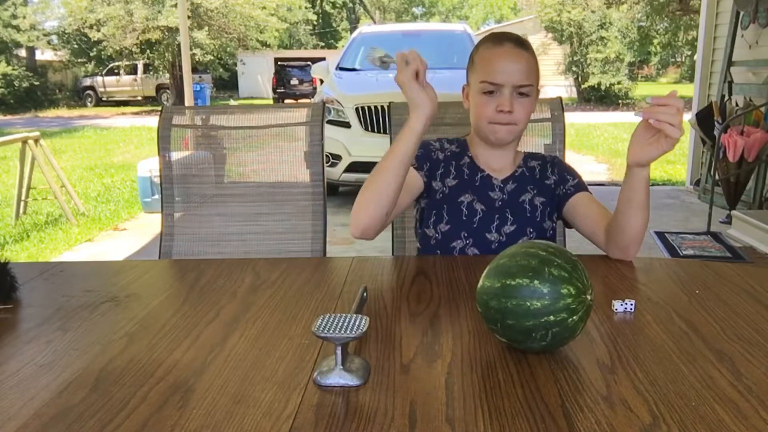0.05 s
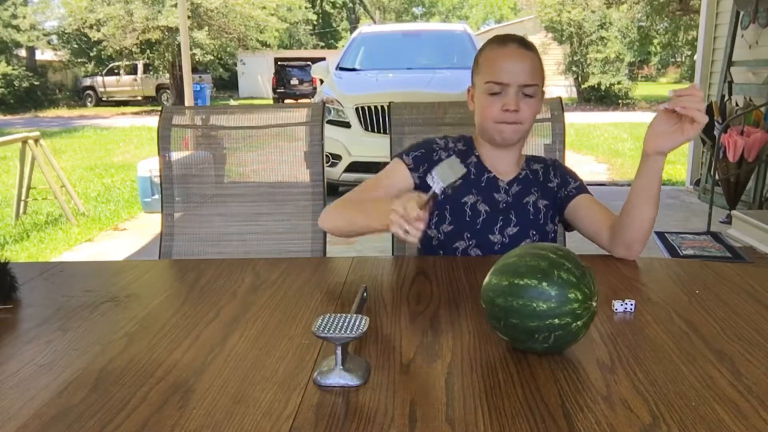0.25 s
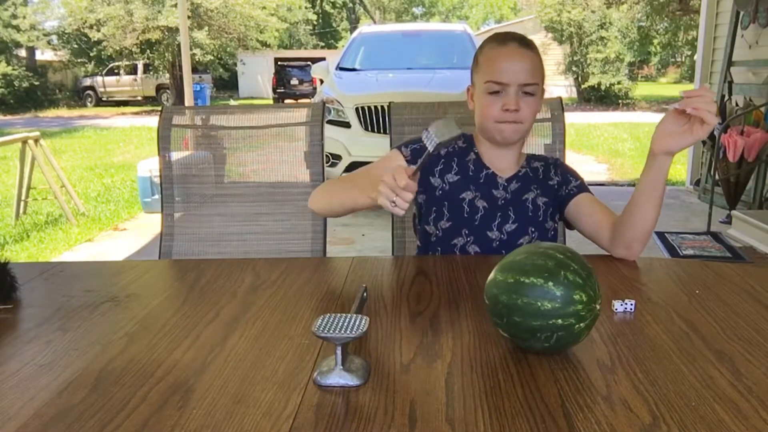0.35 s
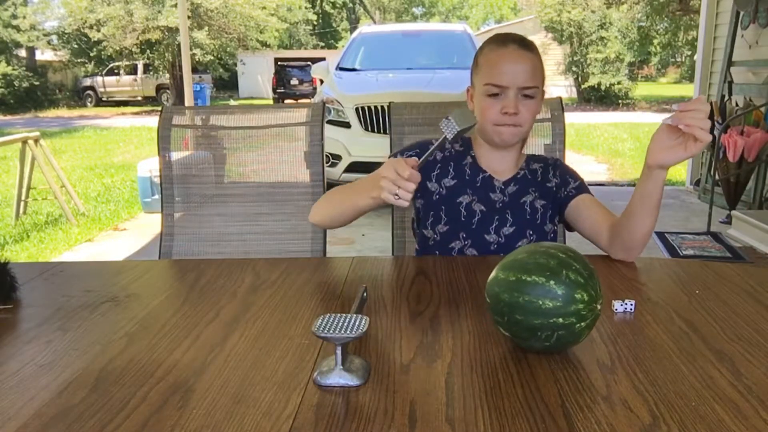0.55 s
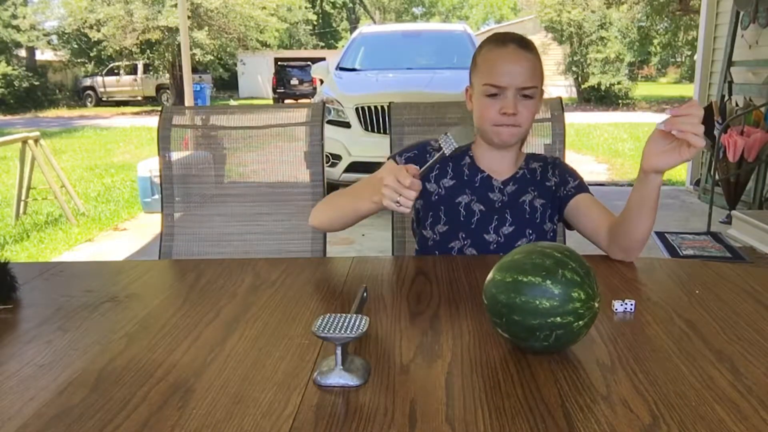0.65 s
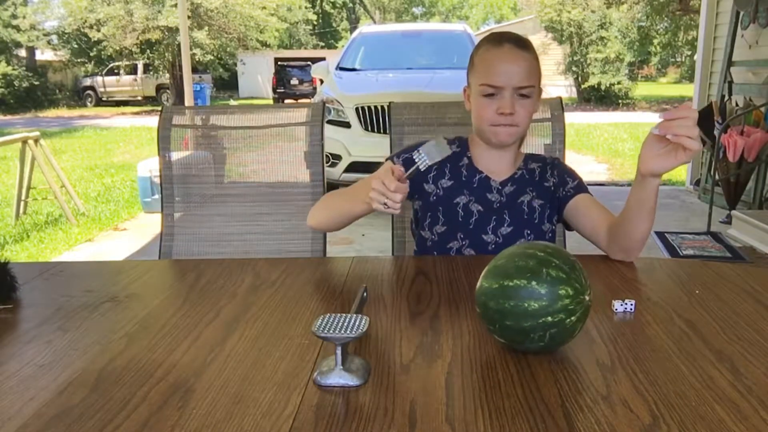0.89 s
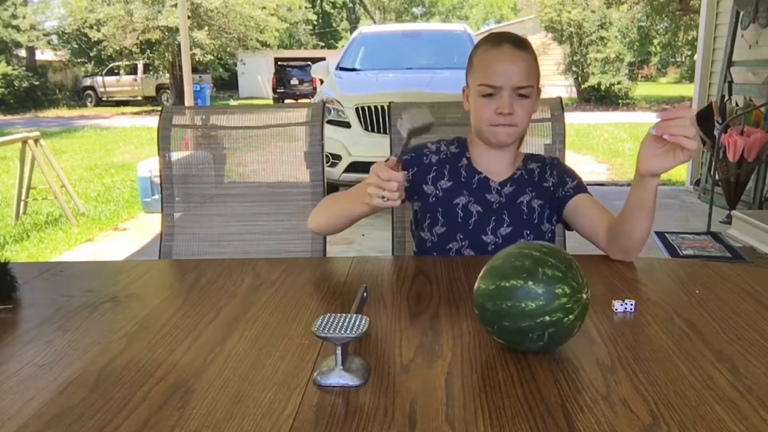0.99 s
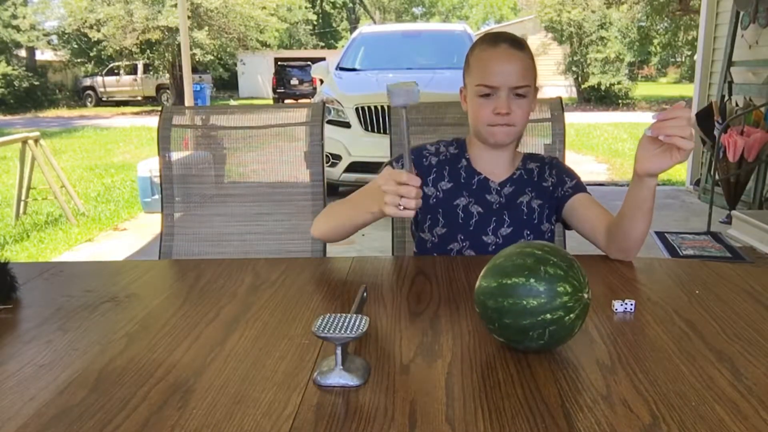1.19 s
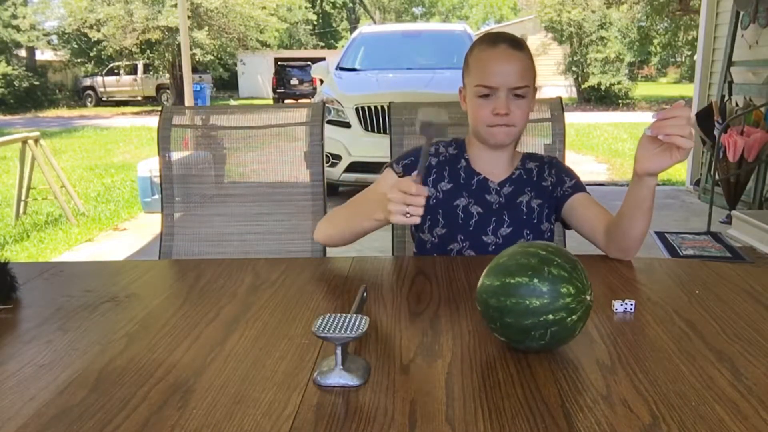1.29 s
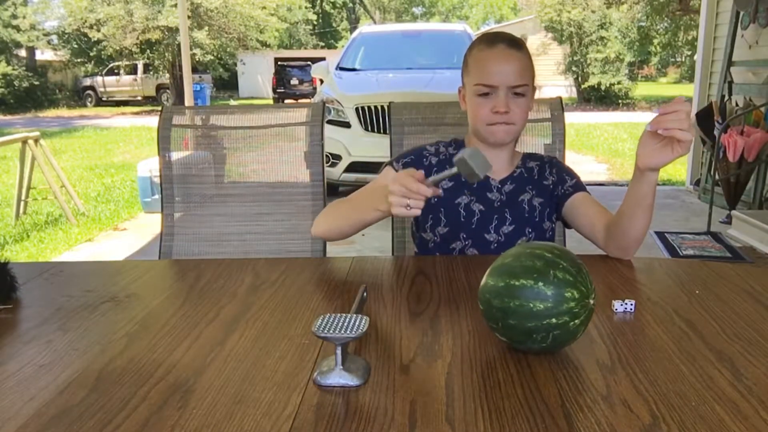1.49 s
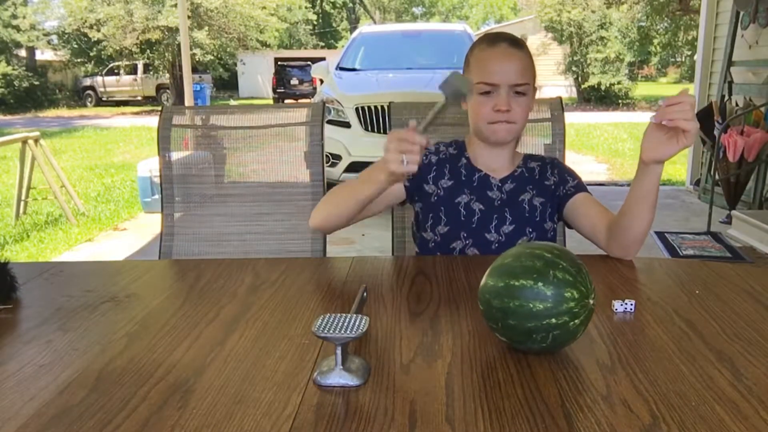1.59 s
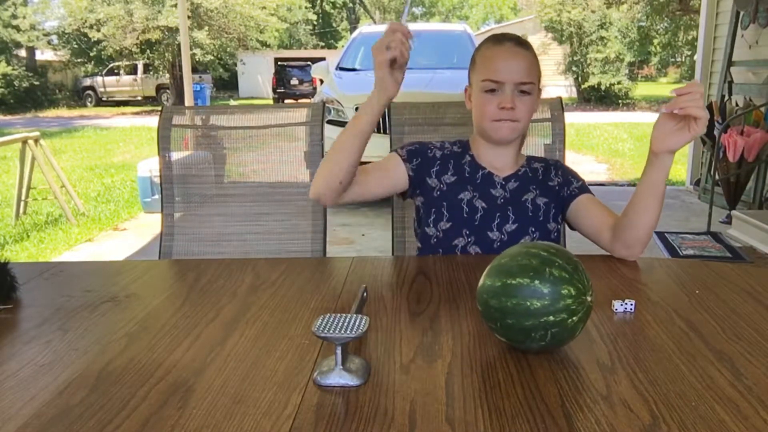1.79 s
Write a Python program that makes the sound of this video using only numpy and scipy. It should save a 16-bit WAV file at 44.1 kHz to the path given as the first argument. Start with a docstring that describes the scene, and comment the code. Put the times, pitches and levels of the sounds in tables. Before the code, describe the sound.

Close to the microphone, one hard mallet blow cracks and knocks on a hollow melon, followed by a low table thump, a short porch echo and small wooden taps, over quiet yard air, engine hum and insects.

```python
"""Mallet on a watermelon, under a porch

Close by, a small metal mallet whacks a watermelon on a wooden table: a crack, a hollow knock, a thump.
Crack, melon, table, tail lumps and rattle are damped modes; the porch answers with decaying noise-like taps.
Beyond it, a distant engine drones in wavering sines, a far bird whistles once in a gliding sine,
and shaped, patchy noise makes the yard with its insect hiss."""
import sys
import numpy as np
from scipy import signal
from scipy.io import wavfile
from scipy.ndimage import uniform_filter1d

SR = 44100
rng = np.random.default_rng(int(sys.argv[2]) if len(sys.argv) > 2 else 0)


def inscribe(sig):
    """Save sig as 16-bit PCM at rate SR to the path in sys.argv[1].

    A 1-D sig is mono; a 2-D sig holds one channel per row.
    Samples are clipped to [-1, 1] before scaling.
    """
    pcm = np.round(np.clip(np.atleast_2d(sig).T, -1, 1) * 32767)
    wavfile.write(sys.argv[1], SR, pcm.astype(np.int16))


N = 81585
TIME = np.arange(N) / SR  # seconds
BLOW_S, BLOW_DB = 0.22945, -3  # when and how hard the mallet lands


def amp(db):
    """Decibels to amplitude."""
    return 10 ** (np.asarray(db) / 20)


def evened(x):
    """Scale to an rms of 1."""
    return x / np.sqrt(np.mean(x ** 2) + 1e-20)


def curve(points, column=1):
    """A table column joined by straight lines in time."""
    p = np.array(points)
    return np.interp(TIME, p[:, 0], p[:, column])


def between(points):
    """True from the first to the last time of a table."""
    return (TIME > points[0][0]) & (TIME < points[-1][0])


def clicks(rows):
    """One impulse for each (start_s, level_db) row."""
    x = np.zeros(N)
    for start_s, level_db in rows:
        x[round(start_s * SR)] += amp(level_db)
    return x


def ring(modes):
    """Sum of damped sines, each with a soft start."""
    t = np.arange(SR // 2) / SR
    total = np.zeros(len(t))
    for pitch_hz, level_db, t60_s, rise_s in modes:
        envelope = amp(level_db - 60 * t / t60_s) * (1 - np.exp(-t / rise_s))
        total += envelope * np.sin(2 * np.pi * pitch_hz * t)
    return total


def struck(rows, modes):
    """Let each (start_s, level_db) impulse set the modes ringing."""
    return signal.fftconvolve(clicks(rows), ring(modes))[:N]


# Spectrum of the open yard, relative: pitch_hz, level_db (per Hz)
YARD_SPECTRUM = [(25, -14), (40, -17.5), (55, -12), (100, -4), (250, -7), (330, -15), (500, -22),
                 (1000, -24.5), (3000, -26), (4500, -35.5), (6000, -38), (8300, -50.5), (9000, -37),
                 (10000, -30.5), (11000, -35), (11500, -52.5), (15800, -63), (16000, -75)]
YARD_DB, PATCH_DB = -52.5, 1.95  # overall rms level, rms patchiness


def yard():
    """Rumble, air and an insect band near 10 kHz: noise whose spectrum varies in patches."""
    frames, hz = N // 256 + 5, np.fft.rfftfreq(1024, 1 / SR)
    real, imag, patches = rng.standard_normal((frames, 513, 3)).T
    patches = uniform_filter1d(patches, 10, 0)  # over pitch
    patches = evened(uniform_filter1d(patches, 12, 1))  # over time
    pitch_hz, level_db = np.transpose(YARD_SPECTRUM)
    level = np.interp(np.log(hz + 1), np.log(pitch_hz), level_db)[:, None]
    spectrum = (real + 1j * imag) * amp(level + PATCH_DB * patches)
    noise = signal.istft(spectrum, nperseg=1024, noverlap=768)[1][:N]
    return amp(YARD_DB) * evened(noise)


WAVER_DB, WAVER_RAD = 1, 0.58  # rms wander of level and phase
WAVER_HZ = 6.94  # fastest wander


def slow():
    """Random wander, rms 1: sines from 0.5 Hz up, the slower ones stronger."""
    return evened(sum(np.sin(2 * np.pi * (f * TIME + rng.random())) / np.sqrt(f)
                      for f in np.geomspace(0.5, WAVER_HZ, 12)))


ENGINE_HZ = 24.14
# Low engine tones, steady but for the waver: multiple (of ENGINE_HZ), level_db (rms)
LOW_TONES = [(2.2, -58), (3, -64), (4, -61)]
# Upper engine tones that swell and fade: multiple (of ENGINE_HZ)
UPPER_TONES = [5, 8, 11.1]
# Their swells: time_s, then level_db (rms) of each upper tone in turn
UPPER_SWELLS = [(0, -58, -54, -67), (.15, -61, -53.5, -57.5), (.35, -68, -52.5, -61.5),
                (.46, -67, -53, -53.5), (.62, -57, -56, -53.5), (.75, -54, -58.5, -59.5),
                (.91, -52, -55.5, -59), (1.15, -54, -55.5, -68.5), (1.33, -57.5, -60, -71),
                (1.45, -53, -68.5, -70), (1.55, -66, -62.5, -75), (1.85, -75, -58.5, -65)]


def engine():
    """Low tones of a distant idling engine, each wavering on its own in level and phase."""
    swelling = [(k, curve(UPPER_SWELLS, i + 1)) for i, k in enumerate(UPPER_TONES)]
    total = np.zeros(N)
    for multiple, level_db in LOW_TONES + swelling:
        level = amp(level_db + WAVER_DB * slow())
        phase = 2 * np.pi * (multiple * ENGINE_HZ * TIME + rng.random())
        total += level * np.sin(phase + WAVER_RAD * slow())
    return np.sqrt(2) * total  # rms to peak


# Whistle of a far bird: time_s, pitch_hz, level_db
WHISTLE = [(.49, 1980, -67), (.53, 2130, -69), (.57, 2150, -58), (.61, 2140, -69)]


def bird():
    """One faint whistle, a sine that rises and then levels off."""
    phase = 2 * np.pi * np.cumsum(curve(WHISTLE)) / SR
    return amp(curve(WHISTLE, 2)) * np.sin(phase) * between(WHISTLE)


# Light taps of something on the table: start_s, level_db (9 dB is taken off), pitch_hz (lowest mode),
# tilt_db (brightness per octave), ring_factor (times t60_s)
RATTLE_TAPS = [(0.411, -31.5, 900, -7, 0.72), (0.479, -41, 602, -2, 0.94), (0.563, -25, 718, 1, 0.95),
               (0.601, -32, 823, -0.5, 0.65), (0.64, -36.5, 732, -0.5, 1), (0.684, -31, 742, 3.9, 0.42),
               (0.718, -41, 726, -14, 0.97), (0.809, -43, 713, -2, 0.78), (0.904, -39.5, 640, 0, 0.58),
               (0.949, -44.5, 610, -3, 0.8)]
# Wooden modes, retuned by each tap: pitch_hz, level_db (relative), t60_s
RATTLE_MODES = [(719, 0, 0.092), (1060, -2, 0.049), (1319, -9.5, 0.071), (1542, -11.5, 0.075),
                (1680, -17.5, 0.072), (1850, -18.5, 0.073), (2200, -28, 0.049)]
# Murmur behind the taps: time_s, level_db (rms)
MURMUR = [(.4, -47), (.44, -51), (.53, -75), (.58, -50.5), (.7, -53.5), (.8, -65.5), (.95, -65.5),
          (1.05, -94)]
MURMUR_BAND_HZ = [532, 937]


def rattle():
    """Light taps on a few wooden modes, with a dull murmur of band noise behind."""
    low_hz = RATTLE_MODES[0][0]
    taps = np.zeros(N)
    for start_s, level_db, tap_hz, tilt_db, ring_factor in RATTLE_TAPS:
        modes = [(hz * tap_hz / low_hz, db - 9 + tilt_db * np.log2(hz / low_hz), t60_s * abs(ring_factor), 0.0003)
                 for hz, db, t60_s in RATTLE_MODES]
        taps += struck([(start_s, level_db)], modes)
    band = signal.butter(2, MURMUR_BAND_HZ, "band", fs=SR, output="sos")
    noise = evened(signal.sosfilt(band, rng.standard_normal(N)))
    return taps + noise * amp(curve(MURMUR)) * between(MURMUR)


# Modes of the wooden table top: pitch_hz, level_db (relative), t60_s, rise_s
TABLE_MODES = [(117.8, -8.5, 0.66, 0.0045), (94.4, -3, 0.26, .004), (58, -7, 0.093, .005)]
# Thumps into it, the blow and the melon's hops: start_s, level_db, ring_factor (times t60_s)
TABLE_THUMPS = [(0.237, -20, 0.72), (.325, -22.5, 0.46), (0.417, -35, .6), (.472, -35.5, 0.76)]


def table():
    """Low damped modes of the table top, set ringing by each thump."""
    total = np.zeros(N)
    for start_s, level_db, ring_factor in TABLE_THUMPS:
        modes = [(hz, db, t60_s * abs(ring_factor), rise_s) for hz, db, t60_s, rise_s in TABLE_MODES]
        total += struck([(start_s, level_db)], modes)
    return total


# Brief pitched lumps in the blow's ringing tail: start_s, pitch_hz, level_db, t60_s
TAIL_LUMPS = [(0.2406, 3000, -22, 0.028), (.247, 2050, -22, 0.028), (0.262, 1510, -16, 0.018),
              (0.271, 1395, -29, 0.025), (0.289, 1930, -29, 0.02), (.302, 656, -30.5, 0.045),
              (.314, 2350, -33, 0.01)]


def tail_lumps():
    """One short damped mode for each lump of the tail."""
    return sum(struck([(start_s, level_db)], [(pitch_hz, 0, t60_s, 0.002)])
               for start_s, pitch_hz, level_db, t60_s in TAIL_LUMPS)


# Decay under the porch, then in the yard beyond, levels relative to the blow:
# pitch_hz, t60_s, level_db, far_t60_s, far_level_db
PORCH_DECAY = [(147, 1, -5, 1.1, -31), (410, 0.45, -5.5, 2.1, -33), (610, 0.21, -2, 3.2, -18.5),
               (970, 0.28, -2, 1.1, -32.5), (1460, 0.33, -1, 0.98, -13), (2210, 0.35, -6.5, 0.98, -36),
               (3100, 0.27, -10, 1.4, -32), (4760, 0.21, -12.5, 1.2, -35), (6900, .24, -14.5, 1.5, -40),
               (8300, 0.21, -23, 2.2, -50), (12000, 0.13, -17.5, 1.8, -48), (16000, 0.24, -37, 1.9, -56)]
PORCH_GAP_S, PORCH_RISE_S = 0.001, 0.0024  # wait after the blow; ramp time per unit of gain
LUMP_DB = 2.5  # rms unevenness of the decay


def porch():
    """Dense taps after the blow that die band by band, near walls fast and the yard slowly."""
    size = 3 * SR // 2
    taps = np.zeros(size)
    at = np.arange(0, size - 20, 20)
    taps[at + rng.integers(0, 20, len(at))] = rng.choice([-1., 1.], len(at))
    hz, t, spectrum = signal.stft(taps, SR, nperseg=256)
    pitch_hz, *columns = np.transpose(PORCH_DECAY)
    t60_s, level_db, far_t60_s, far_level_db = [
        np.interp(np.log(hz + 1), np.log(pitch_hz), column)[:, None] for column in columns]
    near = amp(level_db - 60 * t / t60_s)
    far = amp(far_level_db - 60 * t / far_t60_s)
    lumps = uniform_filter1d(rng.standard_normal(spectrum.shape), size=4, axis=0)
    lumps = evened(uniform_filter1d(lumps, size=3, axis=1))
    shaped = spectrum * np.hypot(near, far) * amp(LUMP_DB * lumps)
    tail = signal.istft(shaped, SR, nperseg=256)[1][:size]
    tail = tail * np.minimum(0.4 + np.arange(size) / SR / PORCH_RISE_S, 1)
    return signal.fftconvolve(clicks([(BLOW_S + PORCH_GAP_S, BLOW_DB)]), tail)[:N]


# Mallet face on rind: pitch_hz, level_db (relative to the blow), t60_s, rise_s
CRACK_MODES = [(2800, 5, 0.0015, .00003), (5000, 0, 0.0012, 0.000028), (7230, 9.5, 0.00048, 0.0000045),
               (13700, -24, 0.00017, 0.0000079)]
# Crack direct and off the table top: delay_s, level_db (relative to the blow)
CRACK_PATHS = [(0, 2), (.00033, -8.5)]
# Hollow melon: pitch_hz, level_db (relative to the blow), t60_s, rise_s
MELON_MODES = [(1760, -6, .01, .0003), (1280, -4, 0.018, 0.001), (655, -0.5, 0.02, 0.00072),
               (574, -14, 0.057, 0.0023), (443, -30, 0.13, 0.0016), (356, -25.5, 0.22, 0.00067),
               (250, -20.5, 0.17, 0.001), (202, -6.5, 0.063, .004)]
# Dull echoes of the blow: delay_s, level_db (relative)
BLOW_ECHOES = [(.0036, -15.5), (.0082, -25), (.0125, -26), (.0855, -36)]
KNOCK_LAG_S = 0.00034  # melon after mallet
LOW_CUT_HZ = 130  # crack and knock both carry little below this
ECHO_HZ = 6100  # the echoes lose treble above this


def blow():
    """The crack, doubled by the table top, and the melon's damped modes, with a few dull echoes."""
    crack = struck([(BLOW_S + delay_s, BLOW_DB + db) for delay_s, db in CRACK_PATHS], CRACK_MODES)
    knock = struck([(BLOW_S + KNOCK_LAG_S, BLOW_DB)], MELON_MODES)
    direct = signal.lfilter(*signal.butter(2, LOW_CUT_HZ, "high", fs=SR), -crack - knock)
    dull = signal.lfilter(*signal.butter(2, ECHO_HZ, fs=SR), direct)
    return direct + signal.fftconvolve(dull, clicks(BLOW_ECHOES)[:SR // 2])[:N]


def scene():
    """Everything at the microphone, one channel."""
    return (blow() + porch() + tail_lumps() + table() + rattle() + bird() + engine() + yard())[None]


FULL, EDGE_HZ = 1.05, 16500  # overload ceiling (amplitude), top of the band


def record(dry):
    """Soft overload, strongest on the loud crack, then the band limit."""
    limited = FULL * np.tanh(dry / FULL)
    lowpass = signal.firwin(511, EDGE_HZ, window=("kaiser", 9), fs=SR)
    return signal.oaconvolve(limited, lowpass[None], "same")


dry = scene()
out = record(dry)
inscribe(out)
```